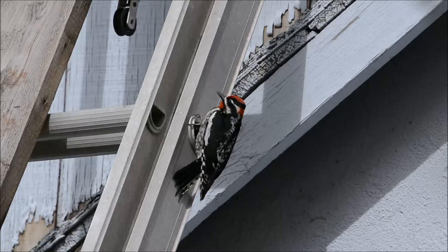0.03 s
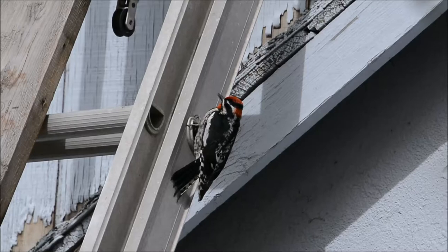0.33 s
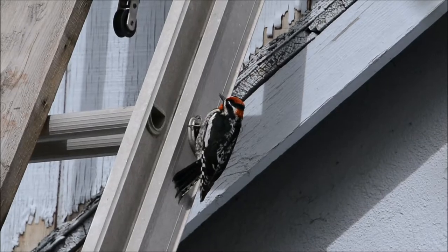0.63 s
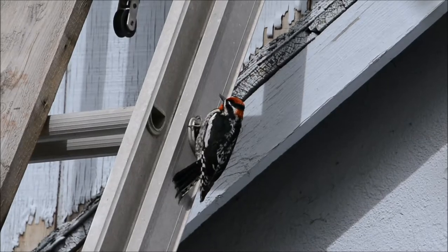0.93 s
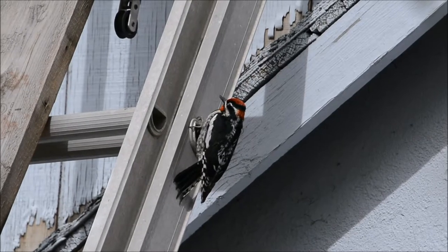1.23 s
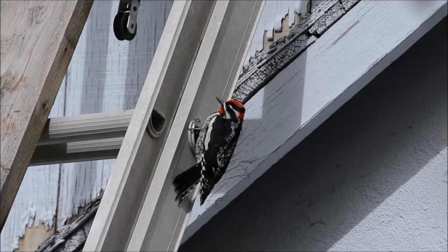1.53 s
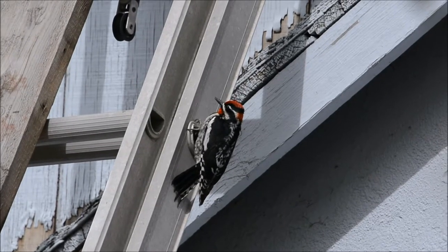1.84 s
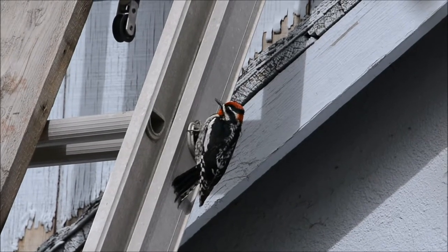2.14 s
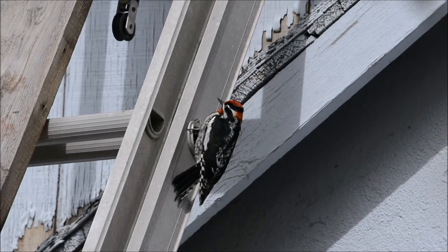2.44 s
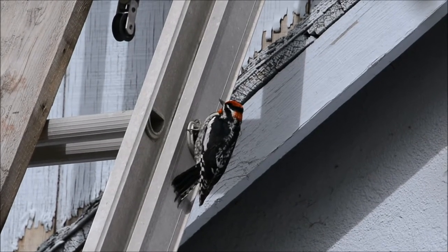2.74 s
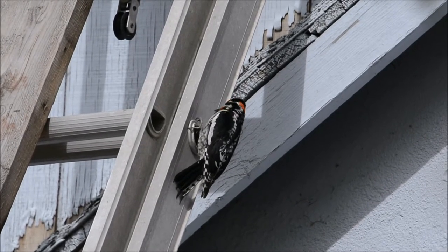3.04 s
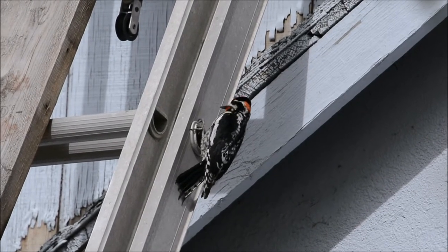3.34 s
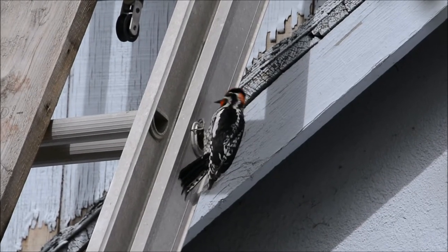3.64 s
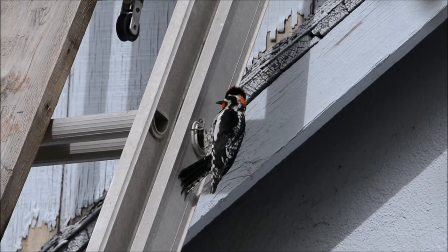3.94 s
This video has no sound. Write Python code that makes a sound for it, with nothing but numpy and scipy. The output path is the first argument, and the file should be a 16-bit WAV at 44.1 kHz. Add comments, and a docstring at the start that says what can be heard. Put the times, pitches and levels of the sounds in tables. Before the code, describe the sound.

A woodpecker drums on a metal ladder with ringing clangs, after faint distant birdsong.

```python
"""By a house wall, a woodpecker drums on an aluminium ladder: five blows, a pause, then three more.
Each blow sets the rails clanging, with a bright rattle and the clacks of loose parts on top.
Before that, small birds chirp, whistle and trill in the distance, and something knocks faintly.
A soft outdoor hush and a low hum lie under it all."""
import sys
import numpy as np
from scipy import signal
from scipy.fft import rfft, irfft
from scipy.io import wavfile

SR = 44100
rng = np.random.default_rng(int(sys.argv[2]) if len(sys.argv) > 2 else 0)


def to_wav(sig):
    """Store sig (one row per channel, or 1-D mono) as 16-bit WAV at the path in sys.argv[1].

    Samples outside -1..1 are clipped; the rate is SR.
    """
    pcm = np.clip(np.atleast_2d(sig), -1, 1) * 32767
    pcm = np.round(pcm).astype(np.int16)
    wavfile.write(sys.argv[1], SR, pcm.T)  # frames by channels


N = 176400
TIME = np.arange(N) / SR

# Tone colour of the outdoor hush: f/Hz, level/dB
HUSH_COLOUR = [(25, -21), (50, -17), (70, -8.5), (90, -2.5), (125, -4), (200, -4.5), (380, -8), (560, -4.5),
               (780, 2), (1000, -2), (1400, -4.5), (2100, -14), (3000, -16), (5000, -33), (7000, -31),
               (10000, -31), (15000, -38)]
# How alike far sounds are in the two ears: f/Hz, likeness/0-1
AIR_LIKENESS = [(30, 0.85), (70, 0.99), (150, 1), (500, 0.88), (1000, 0.97), (2500, 0.66), (5000, 0.79),
                (12000, 0.077)]
# Slow rise and fall of the hum: t/s, level/dB
HUM_SWELL = [(.3, -3), (.7, -6), (1.2, 0.5), (1.7, -4.5), (2.3, -7.5), (2.75, 3.5), (3.2, -5.5), (3.7, -1)]
# Tone colour of the far bird chorus: f/Hz, level/dB
CHORUS_COLOUR = [(2000, -13), (3000, -2.5), (4200, 1.5), (5300, -4.5), (6500, -12.5), (9000, -21.5),
                 (12000, -44)]
# Loudness of that chorus: t/s, level/dB
CHORUS_LEVEL = [(.1, -58.5), (.33, -54), (.45, -51), (.6, -51), (.75, -56.5), (.9, -54.5), (1.0, -57),
                (1.45, -52.5), (1.57, -58.5), (1.75, -52), (1.92, -56), (2.3, -54), (2.65, -52),
                (2.78, -57), (2.95, -53), (3.2, -61), (3.35, -56), (3.6, -57.5)]
# Tone colour of the knock: f/Hz, level/dB
KNOCK_COLOUR = [(150, -10), (1000, 0.5), (1300, -4), (1420, 2), (1550, -6), (2200, -6), (3200, -16),
                (8000, -55)]
# Single chirps: t/s, length/s, start f/Hz, end f/Hz, level/dB
CHIRPS = [(0.117, 0.082, 2800, 2750, -59), (0.197, 0.053, 5500, 5340, -57.5),
          (0.231, 0.074, 4950, 3765, -50.5), (0.318, 0.054, 4800, 5240, -59),
          (0.364, 0.1275, 3846, 4055, -44), (0.434, 0.019, 4000, 3160, -46.5),
          (0.489, 0.041, 4150, 4170, -49), (.46, 0.049, 5380, 5240, -63), (0.554, 0.048, 5400, 3900, -52),
          (0.66, 0.042, 3500, 2730, -54), (1.043, 0.054, 2850, 3096, -52), (1.082, 0.071, 4150, 4500, -57),
          (1.188, 0.056, 3650, 4430, -57.5), (1.30, 0.079, 5200, 3680, -59.5),
          (1.361, 0.035, 4100, 2760, -55), (1.406, 0.04, 4050, 4170, -44.5),
          (1.443, 0.04, 4200, 2750, -50.5), (1.61, 0.016, 2940, 2820, -55), (1.64, 0.046, 3750, 4100, -59),
          (1.712, .09, 4700, 4940, -57.5), (2.013, 0.05, 4500, 3545, -47),
          (2.121, 0.038, 4300, 3900, -52.5), (2.329, 0.065, 5300, 5480, -50),
          (2.595, 0.021, 3650, 3930, -48.5), (2.683, .04, 8700, 7200, -60),
          (2.805, 0.027, 3500, 3850, -50.5), (3.093, 0.081, 4600, 3500, -55),
          (3.225, 0.026, 2600, 3120, -51), (3.391, 0.047, 4800, 4750, -57), (3.482, 0.04, 2700, 3380, -48)]
# Two high whistles, one list each: t/s, f/Hz, level/dB
WHISTLES = [
    [(.46, 8950, -72), (.49, 9350, -70), (.52, 9400, -68), (.553, 9100, -57.5), (.575, 9600, -66),
     (.605, 9650, -72)],
    [(2.055, 9230, -68), (2.075, 9200, -68), (2.11, 8970, -73), (2.16, 8770, -59), (2.21, 9060, -77)],
]
# A bird's trill: t/s, centre f/Hz, level/dB, pulse rate/Hz
TRILL = [(1.8, 5150, -64, 71), (2.1, 5360, -62, 80), (2.3, 5770, -59, 50), (2.37, 5830, -57, 50),
         (2.45, 6340, -55.5, 60), (2.54, 6850, -63, 41), (2.58, 6740, -61, 55)]
# The buzz that ends the trill: t/s, centre f/Hz, level/dB, pulse rate/Hz
BUZZ = [(2.51, 5230, -55, 54), (2.56, 5300, -55, 51), (2.58, 5480, -48.5, 68), (2.68, 5560, -51.5, 70),
        (2.71, 5860, -57, 73)]
# Loose parts falling back just after a blow: t/s, level/dB
CLACKS = [(3.522, 3), (3.59, 0.5), (3.655, -18), (3.695, -9), (3.737, -9), (3.874, -2)]
# How alike the ladder is in the two ears: f/Hz, likeness/0-1
LADDER_LIKENESS = [(500, .999), (1500, 0.97), (2600, 0.92), (5000, 0.92), (9000, 0.7), (13000, 0.2)]
# Bright rattle where the beak lands: f/Hz, level/dB, fade/s (time to drop by 60 dB)
RATTLE = [(300, -45, .1), (2000, -30, 0.086), (4000, -11, .15), (6460, -3.5, 0.21), (8950, 4, .19),
          (9900, 0, .16), (10900, -6, 0.23), (12600, -9, .14), (13800, -28, .1), (15700, -25, .08)]
# The ladder's crowd of weak ringing tones: f/Hz, level/dB, fade/s
WEAK_TONES = [(300, -39, 0.41), (431, -33, 0.34), (492.6, -1.5, 0.53), (590, -12.5, 0.46),
              (670, -8.5, 0.54), (810, -4.5, 0.24), (920, -9.5, 0.63), (1105, 5.5, 0.47),
              (1346, -8.5, 0.35), (1680, 2, .25), (1820, -10, 0.49), (2104, 0.5, 0.3), (2200, -16, 0.28),
              (2590, -10, 0.51), (2930, -15, 0.33), (3180, -11, .3), (3420, -19, 0.34), (4770, -27, 0.54),
              (5100, -32, 0.4), (5530, -25.5, 0.4), (5950, -39.5, 0.74), (9000, -55, .2)]
# The ladder's strong ringing tones: f/Hz, level/dB, fade/s
STRONG_TONES = [(499.7, -42.8, 1.19), (514.6, -33.1, 0.68), (664.1, -37.4, 0.3), (763.0, -31.9, 1.09),
                (773.8, -29.1, 0.69), (827.3, -26.9, 0.42), (973.4, -19.8, 0.1), (1029.5, -21.7, 0.66),
                (1053.0, -17.6, 1.01), (1050.8, -13.4, 0.18), (1150.0, -25.5, 0.79), (1140.1, -21.6, 0.29),
                (1216.5, -7.4, 0.06), (1213.6, -37.7, 0.47), (1288.0, -21.0, 0.05), (1516.6, -14.9, 0.32),
                (1549.4, -14.3, 0.7), (1557.2, -29.1, 0.87), (1582.3, -15.7, 0.23), (1636.7, -17.3, 0.27),
                (1991.3, -32.5, 1.15), (2072.9, -21.9, 0.38), (2079.2, -9.7, 0.04), (2089.8, -19.2, 0.25),
                (2496.1, -43.4, 0.53), (2647.2, -38.6, 0.2), (2698.5, -39.3, 0.65), (2785.1, -28.9, 0.04),
                (2853.5, -31.0, 0.58), (3032.7, -34.5, 0.25), (3199.0, -41.8, 0.35), (3285.6, -43.9, 0.37),
                (4694, -45, 0.4), (5540, -47, 0.3), (8730, -43, 0.2)]
# Beak blows: t/s, then level/dB for each of clang, weak tones, rattle and thud
BLOWS = [(3.51193, 1.0, -.5, 0, -6), (3.58383, 1.6, -1, -.5, 4), (3.64227, 1.6, 2, -2.5, 0),
         (3.68602, -.5, 0, -2, -3), (3.72403, -12, -7, -8, -8), (3.86294, .1, -.5, .5, -6),
         (3.90178, -2.1, -1, -4, -3), (3.93308, -15, -9, -11, -10)]


def from_db(db):
    """Turn decibels into a number to multiply by."""
    return 10 ** (np.asarray(db) / 20)


def unit_level(x):
    """Scale a signal to an average strength (rms) of 1."""
    return x / np.sqrt(np.mean(x ** 2) + 1e-20)


def fade(t, fade_s):
    """Die away by 60 dB every fade_s seconds."""
    return np.exp(-np.log(1000) * t / fade_s)


def at_hz(rows, hz, column=1):
    """Look up a table between its rows, spacing frequencies by octaves."""
    table = np.array(rows)
    return np.interp(np.log(hz + 1e-3), np.log(table[:, 0]), table[:, column])


def in_time(rows):
    """Join a table's points in time, giving one curve per column."""
    times, *columns = np.transpose(rows)
    return [np.interp(TIME, times, column) for column in columns]


def during(rows):
    """Switch on softly at a table's first time and off at its last."""
    return np.clip(np.minimum(TIME - rows[0][0], rows[-1][0] - TIME) / 0.0056, 0, 1)


def drift(rate_hz):
    """A random wander of about 1 either way; a higher rate moves faster."""
    hz = np.arange(N // 2 + 1) * SR / N
    return unit_level(irfft(rfft(rng.standard_normal(N)) / (1 + (hz / rate_hz) ** 2), N))


def tone(hz):
    """A pure tone that follows a pitch curve."""
    return np.sqrt(2) * np.sin(2 * np.pi * np.cumsum(hz) / SR)


def left_right(shared, opposed, alike):
    """Mix two noises into a left and right pair with the given likeness."""
    return np.sqrt(1 + alike) * shared + np.sqrt(1 - alike) * opposed * [[1], [-1]]


def stereo_noise(colour, likeness, size=N):
    """Noise for two ears with the given tone colour."""
    hz = np.arange(size // 2 + 1) * SR / size
    shared, opposed = rfft(rng.standard_normal((2, size)))
    pair = left_right(shared, opposed, alike=np.clip(at_hz(likeness, hz), 0, .9995))
    return unit_level(irfft(pair * from_db(at_hz(colour, hz)), size))


def bands(sound, edges_hz):
    """Split a sound into frequency bands; give each one's centre and its sound."""
    size = sound.shape[-1]
    hz = np.arange(size // 2 + 1) * SR / size
    spectrum = rfft(sound)
    for low, high in zip(edges_hz, edges_hz[1:]):
        yield np.sqrt(low * high), irfft(spectrum * ((hz >= low) & (hz < high)), size)


def air(hum_hz=89.8, hum_db=-61.5, hush_db=-49.5):
    """A steady far hush and a low, wavering hum."""
    swell = from_db(hum_db + in_time(HUM_SWELL)[0])
    waver = 1 + 0.39 * drift(2.5)
    hum = swell * waver * tone(hum_hz + 1.53 * drift(3.0))
    return from_db(hush_db) * stereo_noise(HUSH_COLOUR, AIR_LIKENESS) + hum


def chorus(patchy_db=4.5):
    """The farthest birds blur into patches of noise that come and go in narrow bands."""
    voices = stereo_noise(CHORUS_COLOUR, AIR_LIKENESS)
    edges_hz = np.geomspace(2000, 11000, 19)
    patches = sum(band * from_db(patchy_db * drift(8.4)) for _, band in bands(voices, edges_hz))
    return from_db(in_time(CHORUS_LEVEL)[0]) * unit_level(patches)


def knock(start_s=1.009, blur_s=0.017):
    """One dull knock, its start blurred by distance."""
    t = np.maximum(TIME - start_s, 0)
    loudness = from_db(-44.5) * (1 - np.exp(-t / blur_s)) * fade(t, fade_s=0.65)
    return loudness * stereo_noise(KNOCK_COLOUR, AIR_LIKENESS)


def chirps(bend=1.9):
    """Short bird notes whose pitch slides fast at first, then settles."""
    out = np.zeros(N)
    wobble = 1 + 0.012 * drift(92.3)
    for start_s, length_s, start_hz, end_hz, db in CHIRPS:
        progress = np.linspace(0, 1, int(length_s * SR))
        span = int(start_s * SR) + np.arange(len(progress))
        hz = start_hz + (end_hz - start_hz) * np.expm1(-bend * progress) / np.expm1(-bend)
        arch = np.sqrt(np.abs(np.sin(np.pi * progress)))
        out[span] += from_db(db - 0.5) * arch * tone(hz * wobble[span])
    flutter = unit_level(1 + 0.23 * drift(104))
    return out * flutter


def whistle(rows):
    """A bird's thin, wavering whistle."""
    hz, db = in_time(rows)
    return during(rows) * from_db(db) * tone(hz * (1 + 0.0062 * drift(110)))


def trill(rows, pitch_spread, pulse_depth):
    """A fast-pulsing bird note, made rough by its jittering pitch."""
    hz, db, pulse_hz = in_time(rows)
    pulses = unit_level(1 + pulse_depth * np.cos(2 * np.pi * np.cumsum(pulse_hz) / SR))
    jitter = 1 + pitch_spread * np.tanh(drift(621.4))
    return during(rows) * from_db(db) * pulses * tone(hz * jitter)


def birds(echo_db=-3.5):
    """Distant songbirds, with echoes scattered by trees and walls."""
    song = chirps() + sum(whistle(rows) for rows in WHISTLES)
    song += trill(TRILL, pitch_spread=.24, pulse_depth=.34)
    song += trill(BUZZ, pitch_spread=.06, pulse_depth=.76)
    shared, opposed = rng.standard_normal((2, SR)) * fade(TIME[:SR], fade_s=.35)
    echo_tail = unit_level(left_right(shared, opposed, alike=0.67)) / np.sqrt(SR)
    echoes = signal.fftconvolve(song[None], echo_tail, axes=1)[:, :N]
    return song + from_db(echo_db) * echoes


def clacks(level_db=-35.5, decay_s=0.0072):
    """Loose parts hit the ladder, each with its own short burst of bright noise."""
    out, size = np.zeros((2, N)), SR // 10
    for start_s, db in CLACKS:
        start = int(start_s * SR)
        burst = stereo_noise(RATTLE, LADDER_LIKENESS, size) * np.exp(-TIME[:size] / decay_s)
        out[:, start:start + size] += from_db(level_db + db) * burst
    return out


def dense_ring(table, rise_s=0.0027):
    """Countless close tones of the metal blend into noise; each band fades at its own speed."""
    t = TIME[:SR]
    noise = stereo_noise(table, LADDER_LIKENESS, size=SR)
    edges_hz = np.geomspace(100, 20000, 24)
    ring = sum(band * fade(t, at_hz(table, hz, column=2)) for hz, band in bands(noise, edges_hz))
    return ring * (1 - np.exp(-t / rise_s))


def clang(rise_s=.0011, low_cut_hz=472):
    """The ladder's strong tones ring together; its narrow rails give off little bass."""
    t = TIME[:SR]
    ring = sum((-1) ** k * from_db(db) * np.sin(2 * np.pi * hz * t) * fade(t, fade_s)
               for k, (hz, db, fade_s) in enumerate(STRONG_TONES))
    bass_cut = signal.butter(4, low_cut_hz, "high", fs=SR, output="sos")
    return signal.sosfilt(bass_cut, ring * (1 - np.exp(-t / rise_s)))


def at_blows(sound, levels_db):
    """Play a one-second sound at every blow of the beak."""
    out = np.zeros((2, N + SR))
    for blow, db in zip(BLOWS, levels_db):
        start = int(blow[0] * SR)
        out[:, start:start + SR] += from_db(db) * sound
    return out[:, :N]


def woodpecker_on_ladder(thud_hz=170, lean_left_db=0.24):
    """Each blow of the beak sets off a clang, a faint thud, a crowd of weak tones and a rattle."""
    t = TIME[:SR]
    _, clang_db, weak_db, rattle_db, thud_db = np.transpose(BLOWS)
    thud = np.sin(2 * np.pi * thud_hz * t) * fade(t, fade_s=.03)
    out = at_blows(clang(), clang_db)
    out += at_blows(thud, thud_db - 52)
    out += at_blows(dense_ring(WEAK_TONES), weak_db - 16)
    out += at_blows(dense_ring(RATTLE), rattle_db - 37.5)
    return out * from_db([[lean_left_db], [-lean_left_db]])


def scene():
    """The ladder close by, with birds, air and a knock behind it."""
    return woodpecker_on_ladder() + birds() + chorus() + air() + clacks() + knock()


def record(dry, start_s=0.1, top_hz=16300):
    """Start after a moment of silence, round off the peaks and cut the highest treble."""
    opened = dry * np.clip((TIME - start_s) / 0.0008, 0, 1)
    rounded = opened / (1 + opened ** 16) ** (1 / 16)
    return signal.sosfilt(signal.cheby2(16, 70, top_hz, fs=SR, output="sos"), rounded)


dry = scene()
out = record(dry)
to_wav(out)
```